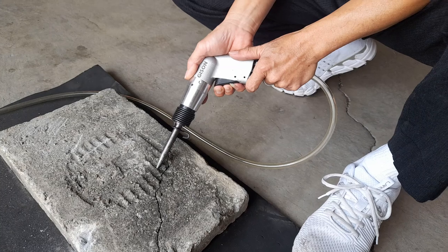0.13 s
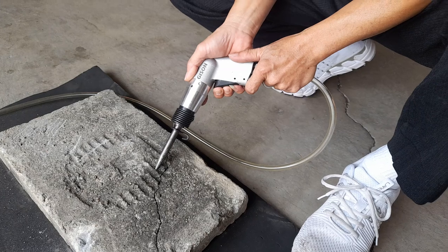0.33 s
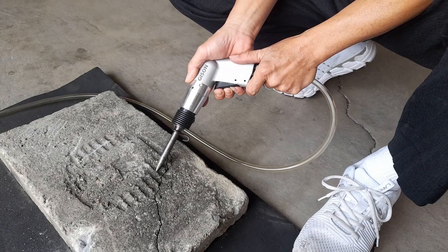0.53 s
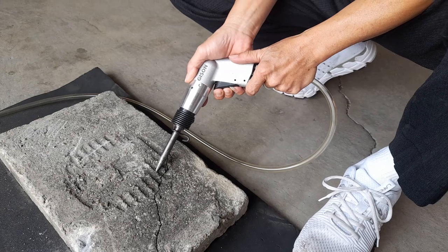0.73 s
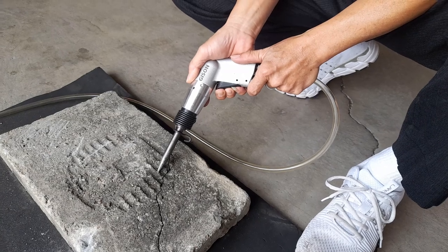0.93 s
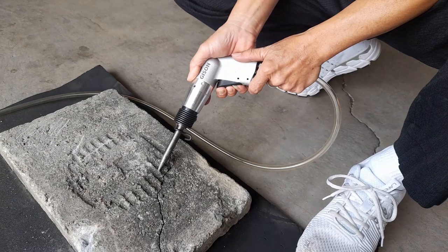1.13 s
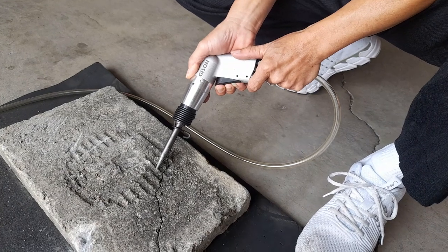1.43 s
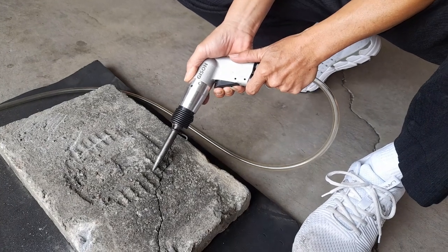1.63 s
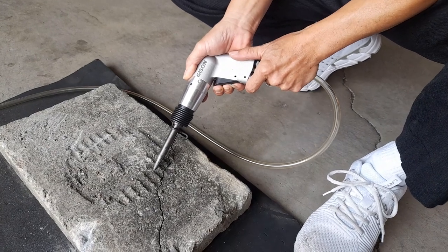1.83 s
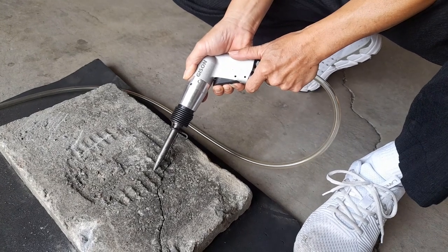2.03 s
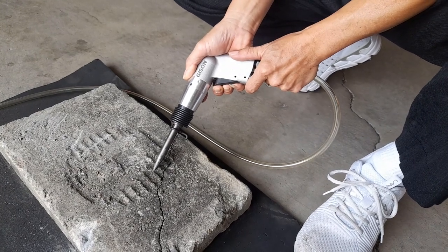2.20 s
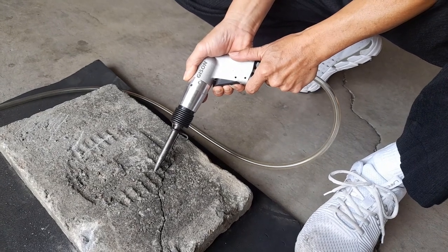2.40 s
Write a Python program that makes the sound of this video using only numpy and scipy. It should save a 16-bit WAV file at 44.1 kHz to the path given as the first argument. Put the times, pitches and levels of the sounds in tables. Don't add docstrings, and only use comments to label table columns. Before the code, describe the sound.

A small air hammer chisels concrete. Silence until 0.1 s, when a low, humming compressor drone with faint whines opens abruptly. At 0.43 s the trigger hisses and knocks; from 0.46 s bright, cracking metallic blows run at about 29 per second, with low exhaust puffs and slab ringing. Around 1.57-1.85 s the chisel slips and the rhythm slows slightly, then resumes steadily until the cut at about 2.6 s. Close, short garage reverberation.

```python
import sys
import numpy as np
from scipy import signal
from scipy.fft import rfft, irfft
from scipy.io import wavfile
from scipy.ndimage import uniform_filter1d, minimum_filter1d

SR = 44100
rng = np.random.default_rng(int(sys.argv[2]) if len(sys.argv) > 2 else 0)


def unload_wav(signal):
    wavfile.write(
        sys.argv[1],
        SR,
        np.round(np.clip(np.atleast_2d(signal).T, -1, 1) * 32767).astype(np.int16),
    )


def invert_db(level):
    return 10 ** (np.asarray(level, dtype=float) / 20)


N = 112896
T = np.arange(N) / SR

# frequency in Hz, density in dB per Hz.
CRACK_SPECTRUM = [(2000, -12), (3500, -2.5), (5000, -1), (7100, -1.5), (8500, 0), (11300, 4.5),
                  (14000, 1.3), (16500, -21)]
LOOSE_KNOCKS_S = [
    .429,
    .4485,
    .467,
    .449,
    .4495,
    .468,
    1.569,
    1.603,
    1.713,
    1.842,
]


def rms_one(x):
    return x / np.sqrt(np.mean(x ** 2) + 1e-20)


def at_hz(points, hz):
    table = np.array(points)
    return np.interp(np.log(hz), np.log(table[:, 0]), table[:, 1])


def drift(rate_hz):
    r = np.exp(-80 * np.pi * rate_hz / SR)
    noise = rng.standard_normal(N // 40 + 2002)
    slow = signal.lfilter([1], [1, -2 * r, r * r], noise)[2000:]
    return np.interp(np.arange(N) / 40, np.arange(len(slow)), rms_one(slow))


def train(s, db):
    out = np.full(N, 1e-18)
    i = np.round(np.asarray(s) * SR).astype(int)
    inside = i < N
    np.add.at(out, i[inside], invert_db(db + 0 * i)[inside])
    return out


def ring(clicks, hz, t60):
    r, w = invert_db(-60 / (t60 * SR)), 2 * np.pi * hz / SR
    return signal.lfilter([0, np.sin(w)], [1, -2 * r * np.cos(w), r * r], clicks)


def dying(clicks, t60):
    return signal.lfilter([1], [1, -invert_db(-60 / (t60 * SR))], clicks)


def coloured(x, spectrum):
    hz = np.maximum(np.arange(N // 2 + 1) * SR / N, 10)
    return rms_one(irfft(rfft(x) * invert_db(at_hz(spectrum, hz)), N))


def compressor():
    # frequency in Hz, density in dB per Hz.
    drone = [(30, -30), (60, -8.5), (120, -11.5), (220, -19.5), (800, -22.5), (1700, -25.5), (6500, -35.5),
             (16000, -43)]
    # frequency in Hz, correlation from -1 to 1.
    likeness = [(60, 0.66), (180, 0.5), (550, 0.44), (1650, -0.0039), (4970, -0.083), (15000, -0.071)]
    # frequency in Hz, left minus right in dB.
    lean = [(60, 4), (250, -3.1), (1000, 2.5), (4000, -1.5), (15000, -2)]
    # centre in Hz, width in Hz, level in dB.
    whines = [(55.6, 23, -61), (1756, 140, -48), (488.6, 15, -53), (322, 33, -46.5), (173, 25, -44.5)]
    # frequency in Hz, level in dB.
    tones = [(721, -42), (1635, -40.5)]
    # time in seconds, level in dB.
    throb_levels = [(0.11, -27.5), (0.15, -28.5), (0.23, -34), (0.29, -26.5), (0.51, -32), (0.57, -40.5),
                    (1.23, -34), (1.26, -69), (1.36, -27.5), (1.44, -46), (1.54, -29.5), (1.68, -41.5),
                    (1.72, -31.5), (1.83, -46), (1.89, -34), (2.14, -45), (2.2, -35.5), (2.56, -38.5)]
    drone_db, duck_s, duck_length_s, duck_db = -30.85, 0.478, 0.057, -5
    throb_hz, throb_wander_hz = 117.05, 2.58
    opposite = np.array([[1], [-1]])

    hz = np.maximum(np.arange(N // 2 + 1) * SR / N, 10)
    alike = np.clip(at_hz(likeness, hz), -1, 1)
    mid, side = rfft(rng.standard_normal((2, N)))
    pair = np.sqrt(1 + alike) * mid + np.sqrt(1 - alike) * side * opposite
    pair = pair * invert_db(at_hz(lean, hz) / 2 * opposite)
    out = invert_db(drone_db + 0.8 * drift(9)) * coloured(irfft(pair, N), drone)
    for centre_hz, width_hz, db in whines:
        resonance = 1 / (1 + (2 * (hz - centre_hz) / width_hz) ** 2)
        out += invert_db(db) * rms_one(irfft(pair * resonance, N))
    for tone_hz, db in tones:
        phase = 2 * np.pi * np.cumsum(tone_hz + 3 * drift(9.5)) / SR
        out += invert_db(db + 2 * drift(12)) * np.sin(phase - np.array([[0], [1.5]]))
    out *= invert_db(duck_db * np.clip((T - duck_s) / duck_length_s, 0, 1))

    turn = 2 * np.pi * np.cumsum(throb_hz + throb_wander_hz * drift(6.35)) / SR
    throb_db = np.interp(T, *np.transpose(throb_levels)) + 3 - drift(14)
    throb = invert_db(throb_db) * np.sin(turn)
    return out + throb * invert_db(1.75 * opposite)


def garage(x):
    t60_s, room_db, cut_hz, gap_s = 0.24, -15.5, 10000, .004
    t = T[:SR // 2]
    tail = rng.standard_normal((2, len(t))) * invert_db(-60 * t / t60_s) * (t > gap_s)
    tail = signal.lfilter([1], [1, -np.exp(-2 * np.pi * cut_hz / SR)], tail)
    tail /= np.sqrt(np.sum(tail ** 2, axis=1, keepdims=True))
    return invert_db(room_db) * signal.fftconvolve(x[None], tail, axes=1)[:, :N]


def start_up():
    # hiss level in dB, knock level in dB, knock frequency in Hz.
    knocks = [(-28, -21, 700), (-30, -13, 650), (-47, -21.5, 1720), (-41, -12, 270), (-45, -21, 1150),
              (-45, -17, 300), (-40, -23, 5000), (-47, -22.5, 640), (-20, -18, 594), (-42, -20.5, 650)]
    t60_s = 0.035
    bright = coloured(rng.standard_normal((2, N)), CRACK_SPECTRUM)
    out = np.zeros((2, N))
    for s, (hiss_db, knock_db, hz) in zip(LOOSE_KNOCKS_S, knocks):
        out += bright * dying(train([s], hiss_db), t60_s)
        out -= ring(train([s], knock_db), hz, t60_s) * [[1], [.7]]
    return out


def strokes():
    # time in seconds, blows completed.
    pace = [(.456, 0), (.4903, 1), (.8028, 10), (1.079, 18), (1.3584, 26), (1.568, 32), (1.607, 33),
            (1.6417, 34), (1.6778, 35), (1.7159, 36), (1.7589, 37), (1.8012, 38), (1.8463, 39),
            (2.0541, 45), (2.1556, 48), (2.3658, 54), (2.571, 60)]
    # time in seconds, crack level in dB, ring relative to crack in dB.
    force = [(0.4554, -17, -14), (0.4898, -15, -14.5), (0.5586, -19.5, -6.5), (0.6619, -14.5, -9.5),
             (0.9053, -19, -5.5), (1.0784, -16.5, -8), (1.1832, -14.5, -6.5), (1.3224, -16.5, -8),
             (1.4272, -16.5, -6), (1.5319, -14, -10.5), (1.6412, -17.5, -13), (1.7155, -16.5, -13),
             (1.915, -21.5, -5), (1.9839, -17.5, -9), (2.0532, -22, -5), (2.155, -15.5, -7.5),
             (2.3291, -21.5, -6), (2.5027, -16.5, -5.5)]
    jitter_s, uneven_db = .0003, 1
    s, count = np.transpose(pace)
    chance = rng.standard_normal((61, 3))
    hits = np.interp(np.arange(61), count, s) + jitter_s * chance[:, 0]
    t, crack_db, ring_db = np.transpose(force)
    crack_db = np.interp(hits, t, crack_db)
    ring_db = crack_db + np.interp(hits, t, ring_db)
    return hits, crack_db + uneven_db * chance[:, 1], ring_db + uneven_db * chance[:, 2]


def exhaust(s, db):
    lead_s, echo_s, echo_db = 0.005295, 0.01503, -11
    follow_db = 0.65 * (db - db.mean())
    puff_s, puff_db = s - lead_s, -22.5 + follow_db
    puff = ring(train(puff_s, puff_db) + train(puff_s + echo_s, puff_db + echo_db), 275, .035)
    thud = ring(train(s, -40 + follow_db), 314, 0.017)
    low_pass = signal.butter(2, 380, fs=SR, output="sos")
    return signal.sosfilt(low_pass, puff + thud * np.array([[1], [-.3]]))


def slab(s, db):
    # frequency in Hz, decay time t60 in seconds.
    body = [(500, .045), (553, .045), (668, .06), (843, .06), (1354, .09), (1730, .04), (2165, .075),
            (2431, .06), (2552, .055), (3037, .08), (3408, .11), (4390, .03), (4960, .02), (7070, .02)]
    # level in dB, right relative to left in dB, right lag in ms.
    radiation = [(-2, -6.5, 0.085), (2, -8.5, 0.25), (-5.5, -1.5, 0.042), (-7.5, -2, 0.23), (6.5, -2, 0.25),
                 (-4.5, -0.7, 0.096), (5.5, -8, .3), (0, -1, 0.24), (7.5, -5.5, 0.32), (2.5, -2, 0.42),
                 (-11, -1, 0.24), (-0.5, -1, .35), (-5, 1.7, 0.25), (-3, 0.8, .4)]
    body_db, return_s, return_db = -3, .02, -15.5
    build_cycles, flutter_db, scatter_db = 12.9, 2.5, 1.4
    out = np.zeros((2, N))
    s = np.r_[s, s + return_s]
    db = np.r_[db, db + return_db]
    for k, ((hz, t60), (mode_db, right_db, lag_ms)) in enumerate(zip(body, radiation)):
        hit_db = db + body_db + mode_db + scatter_db * rng.standard_normal(len(s))
        build_s = build_cycles / hz
        clicks = [train(s, hit_db), train(s + lag_ms / 1000, hit_db + right_db)]
        swell = ring(ring(clicks, hz, build_s), hz, t60)
        gain = (-1) ** k * 2 * np.log(1000) / (build_s * SR)
        out += gain * swell * invert_db(flutter_db * np.array([drift(90), drift(62)]))
    return out


def crack(s, db):
    # frequency in Hz, density in dB per Hz.
    air_spectrum = [(400, -15), (1500, 0), (3000, -19), (4200, -12), (7000, -3), (9000, -5.5), (11500, -1),
                    (16500, 0)]
    # delay in seconds, level in dB.
    walls = [
        (.0065, -40.5),
        (0.0145, -15),
        (0.0196, -12.5),
    ]
    crack_db, crack_t60_s, rise_s = db + 1.5, 0.017, 0.00017
    right_lag_s, right_db, right_t60_s = 0.0011, -7.5, 0.012
    bright = coloured(rng.standard_normal((2, N)), CRACK_SPECTRUM)
    air = coloured(rng.standard_normal((2, N)), air_spectrum)
    bright[1] += .9 * np.roll(bright[0], 14)

    left = dying(train(s, crack_db), crack_t60_s)
    right = dying(train(s + right_lag_s, crack_db + right_db), right_t60_s)
    for delay_s, echo_db in walls:
        right += dying(train(s + delay_s, crack_db + echo_db), crack_t60_s)
    r = np.exp(-1 / (rise_s * SR))
    snap = signal.lfilter([1 - r], [1, -r], [left, right])

    rattle = dying(train(s, db - 15.5), 0.047)
    vent = dying(train(s - 0.005295 + 0.006, db - 17), 0.072)
    leak = invert_db(np.mean(db) - 19.5 + 2 * drift(6.7)) * (T > LOOSE_KNOCKS_S[0])
    return bright * snap + air * (rattle + vent + leak)


def tick(s, db):
    lag_s, tick_db, scatter_db = 0.00037, 6, 3
    high_pass = signal.butter(2, 11500, "high", fs=SR, output="sos")
    noise = signal.sosfilt(high_pass, rng.standard_normal(N))
    hit_db = db + tick_db + scatter_db * rng.standard_normal(len(s))
    hit = noise * dying(train(s + lag_s, hit_db), .005)
    return np.array([hit, invert_db(-8) * np.roll(hit, 14)])


def scene():
    s, crack_db, ring_db = strokes()
    tool = exhaust(s, ring_db) + slab(s, ring_db) + crack(s, crack_db) + tick(s, crack_db) + start_up()
    return compressor() + garage(tool[0]) + tool


def gate(x):
    from_hz, to_hz, bins, share, memory_frames = 3500, 15500, 5, .12, 15
    hz, _, z = signal.stft(x, SR, nperseg=256)
    first, end = np.searchsorted(hz, [from_hz, to_hz])
    last = first + bins * ((end - first) // bins)
    power = (np.abs(z[:, first:last]) ** 2).sum(axis=0)
    power = power.reshape(-1, bins, z.shape[2]).mean(axis=1) + 1e-16
    loudest = -minimum_filter1d(-power.mean(axis=0), memory_frames)
    margin = uniform_filter1d(power, 2, axis=1) / loudest
    margin = margin / np.median(margin, axis=1, keepdims=True) ** .6
    margin = margin * invert_db(5 * rng.standard_normal(margin.shape))
    z[:, first:last] *= np.repeat(margin > np.quantile(margin, share), bins, axis=0)
    return signal.istft(z, SR, nperseg=256)[1][:, :N]


def band_limit(x):
    return signal.sosfilt(signal.butter(12, 16970, fs=SR, output="sos"), x)


def record(dry):
    dip_hz, dip_width_hz, dip_share, open_s = 8600, 2360, 0.53, .1055
    dry = signal.sosfilt(signal.butter(2, 39, "high", fs=SR, output="sos"), dry)
    dry = signal.sosfilt(signal.cheby2(12, 40, 16500, fs=SR, output="sos"), dry)
    b, a = signal.iirpeak(dip_hz, dip_hz / dip_width_hz, fs=SR)
    dry = dry - dip_share * signal.lfilter(b, a, dry)
    return band_limit(gate(dry) * (T > open_s))


dry = scene()
out = record(dry)
unload_wav(out)
```